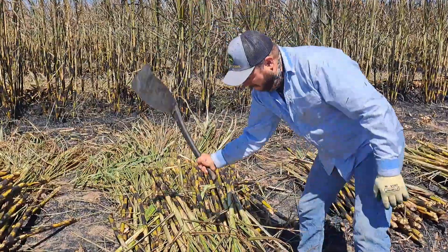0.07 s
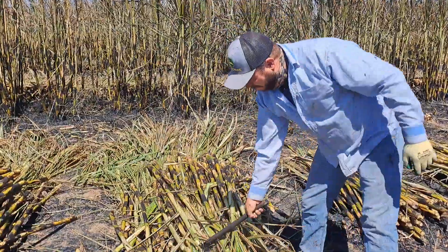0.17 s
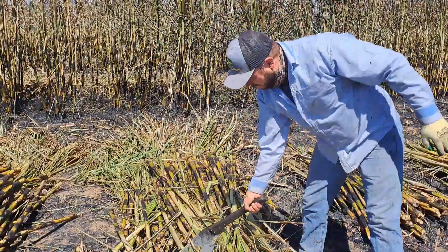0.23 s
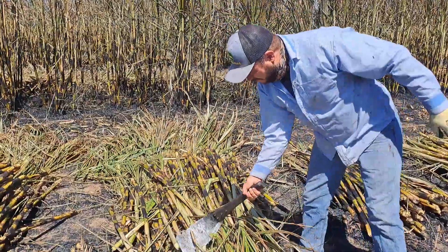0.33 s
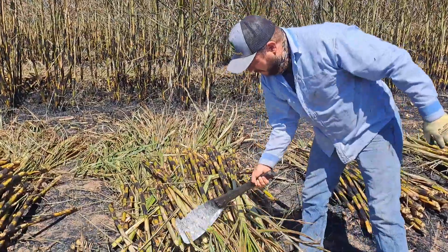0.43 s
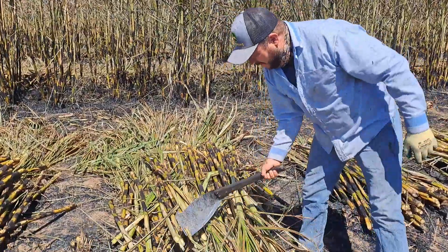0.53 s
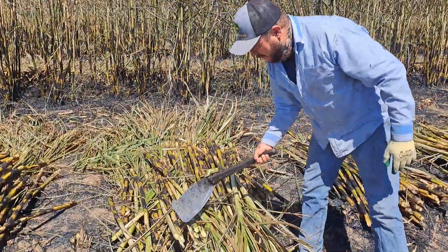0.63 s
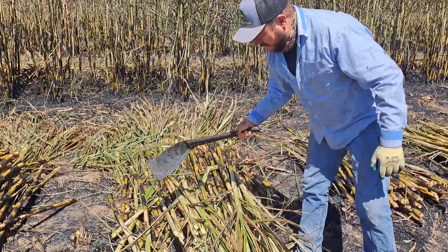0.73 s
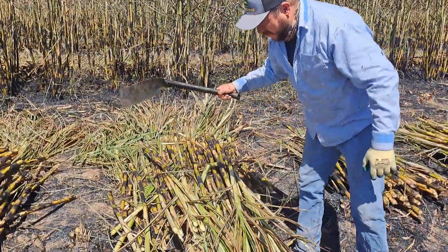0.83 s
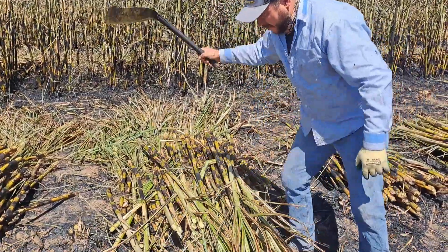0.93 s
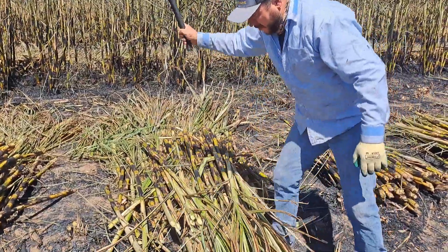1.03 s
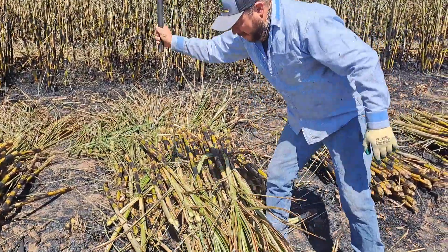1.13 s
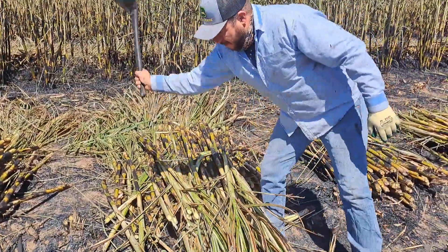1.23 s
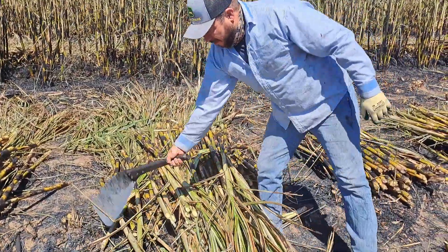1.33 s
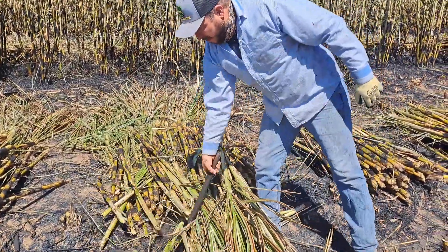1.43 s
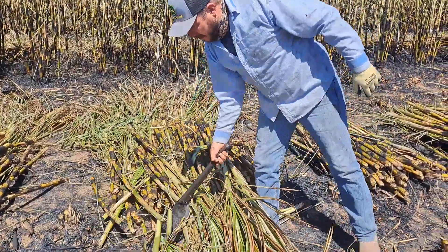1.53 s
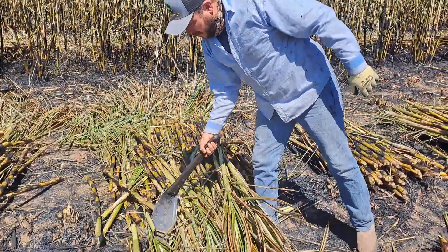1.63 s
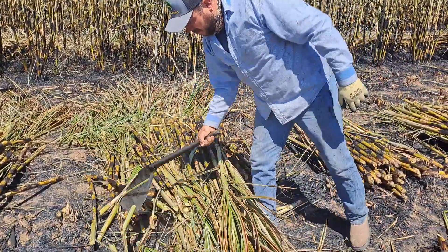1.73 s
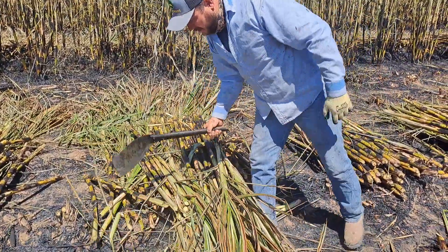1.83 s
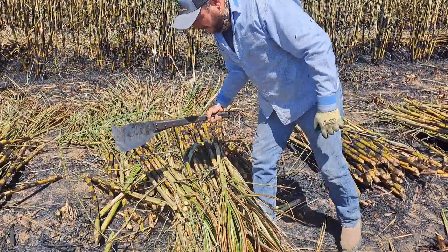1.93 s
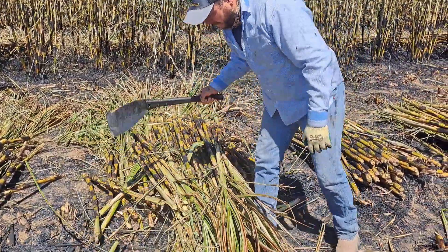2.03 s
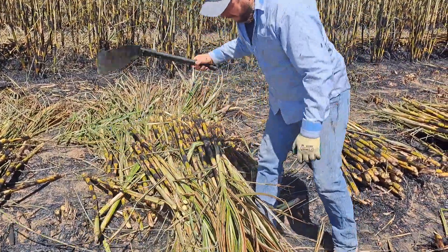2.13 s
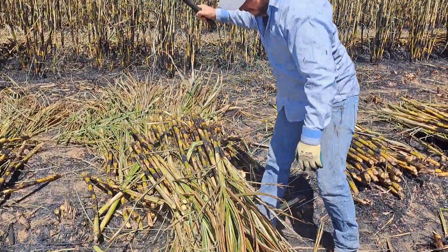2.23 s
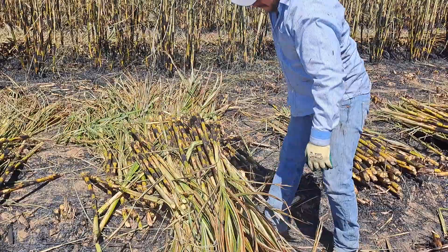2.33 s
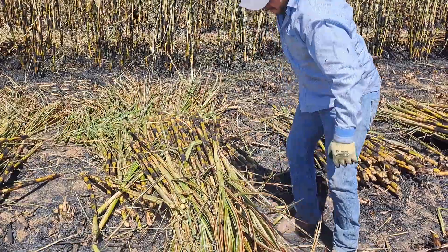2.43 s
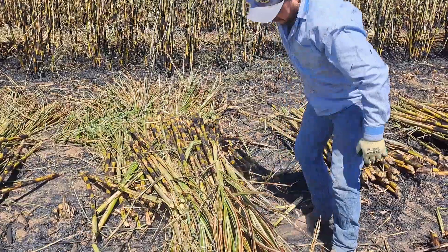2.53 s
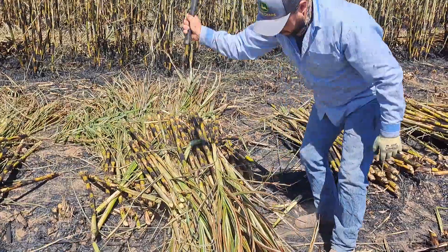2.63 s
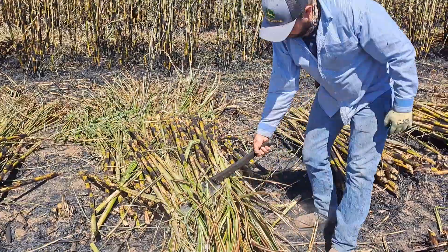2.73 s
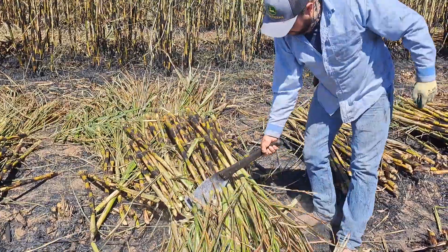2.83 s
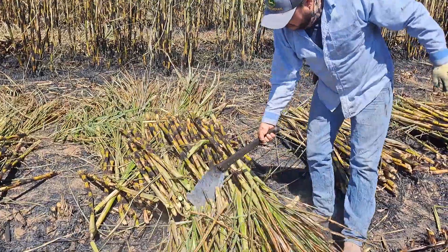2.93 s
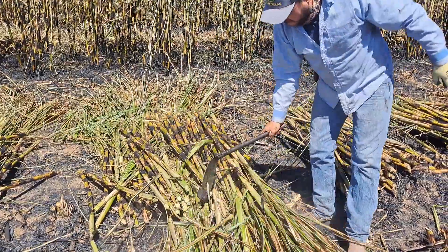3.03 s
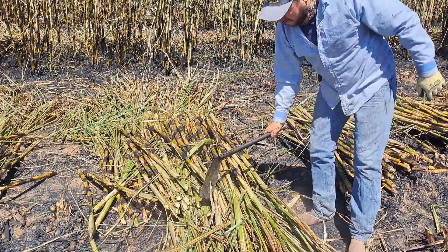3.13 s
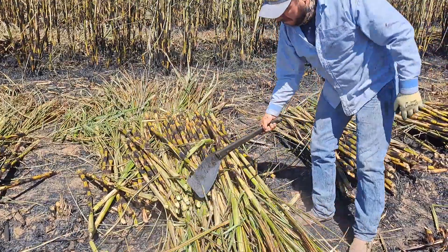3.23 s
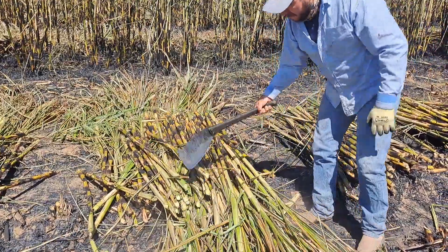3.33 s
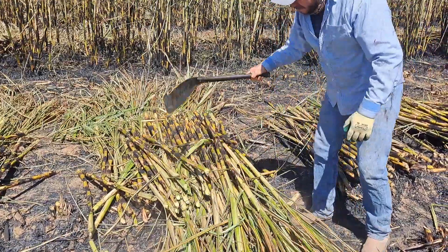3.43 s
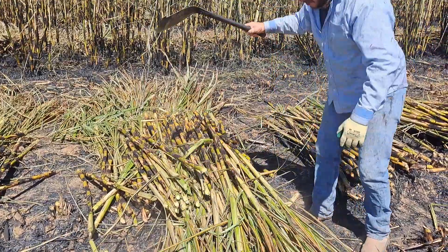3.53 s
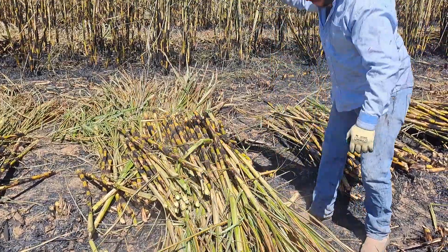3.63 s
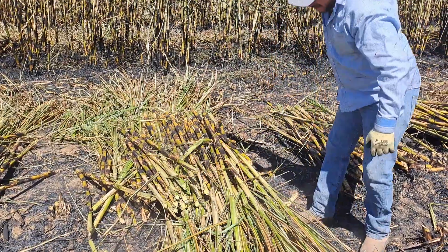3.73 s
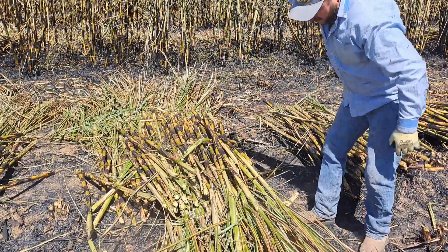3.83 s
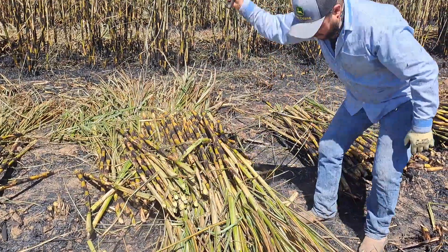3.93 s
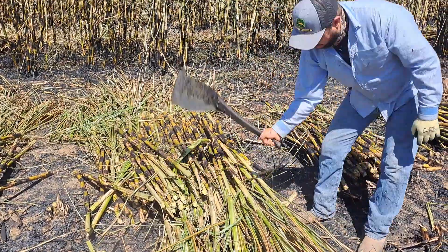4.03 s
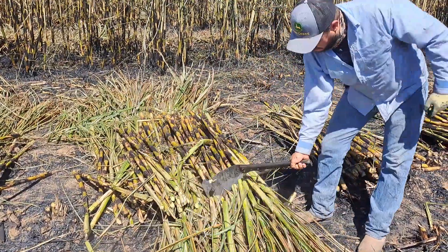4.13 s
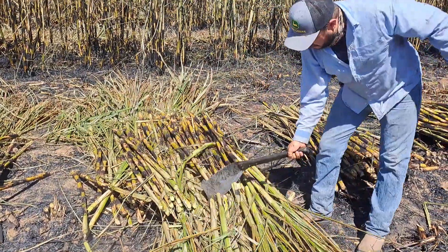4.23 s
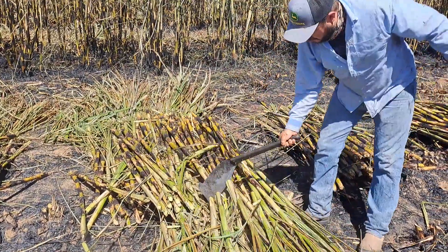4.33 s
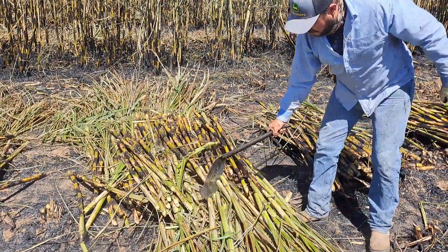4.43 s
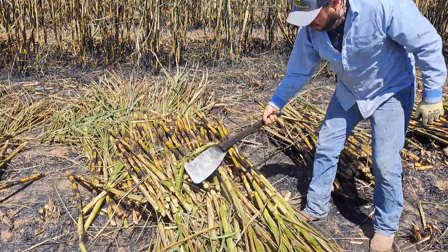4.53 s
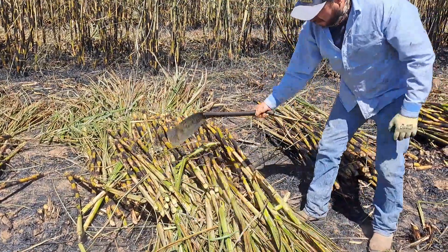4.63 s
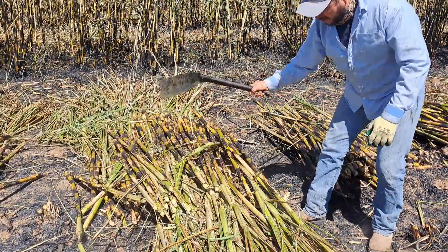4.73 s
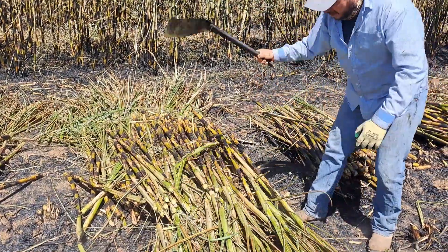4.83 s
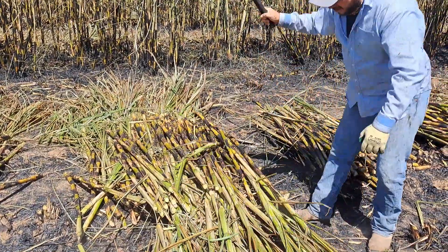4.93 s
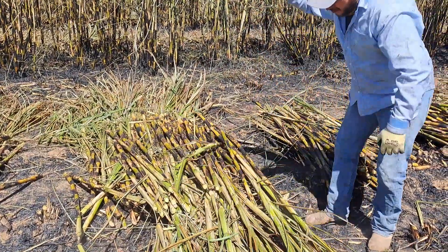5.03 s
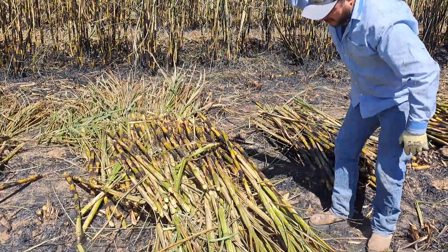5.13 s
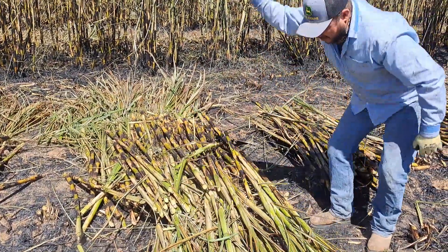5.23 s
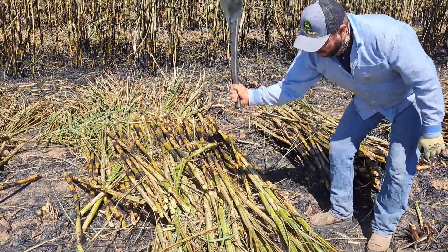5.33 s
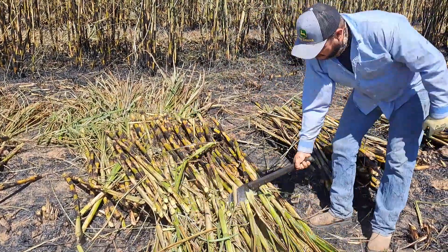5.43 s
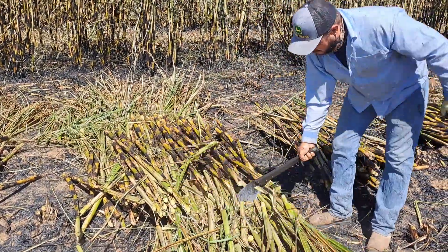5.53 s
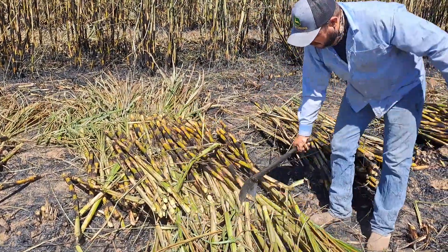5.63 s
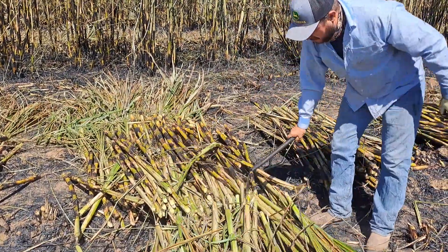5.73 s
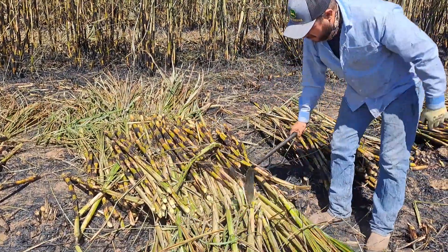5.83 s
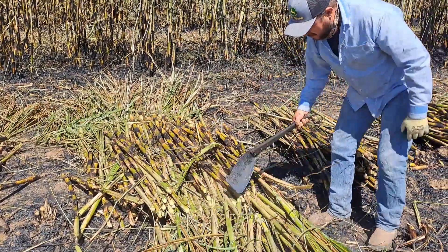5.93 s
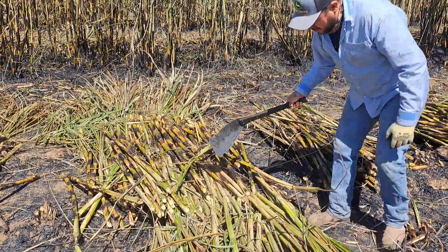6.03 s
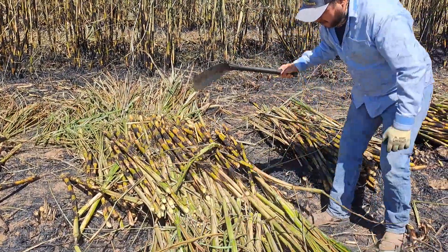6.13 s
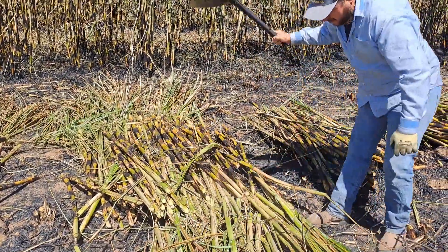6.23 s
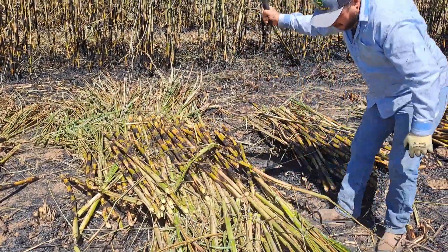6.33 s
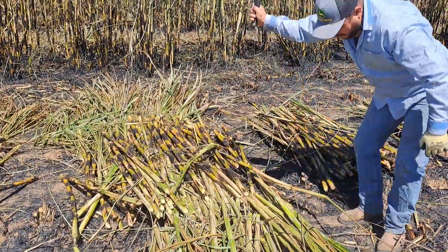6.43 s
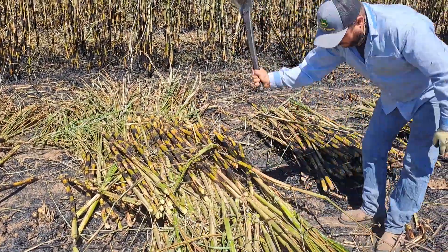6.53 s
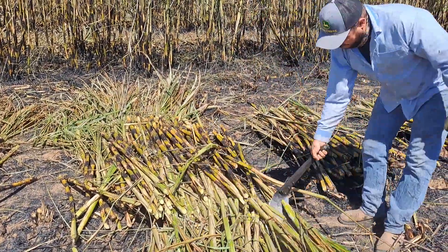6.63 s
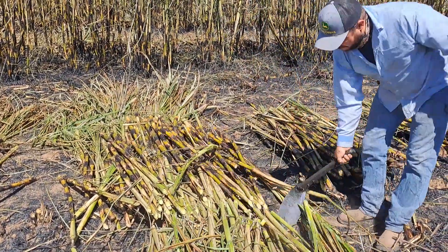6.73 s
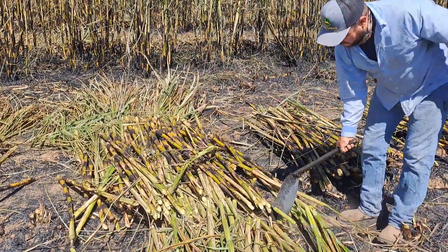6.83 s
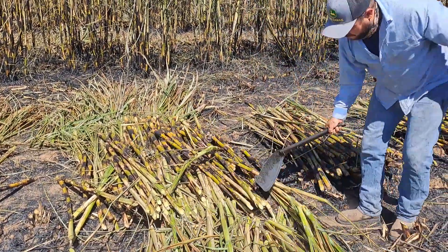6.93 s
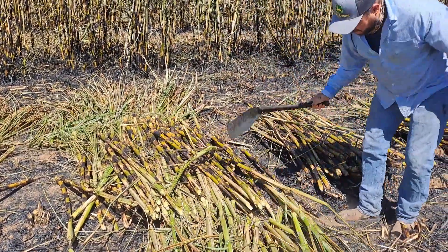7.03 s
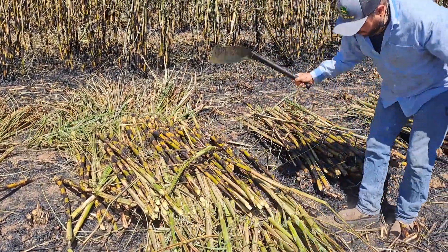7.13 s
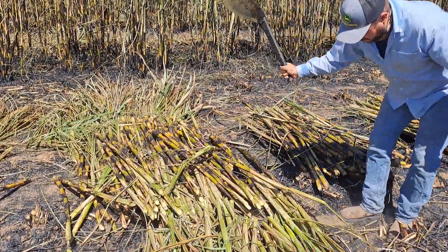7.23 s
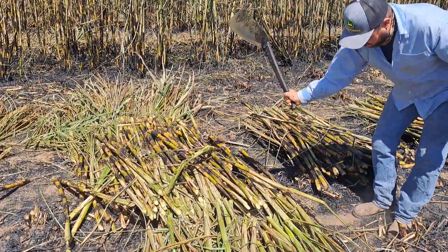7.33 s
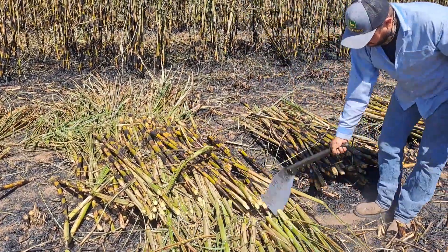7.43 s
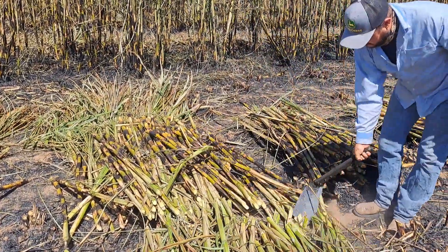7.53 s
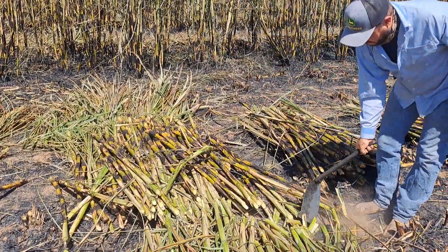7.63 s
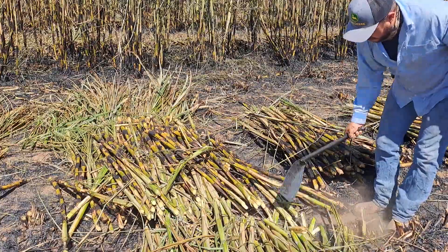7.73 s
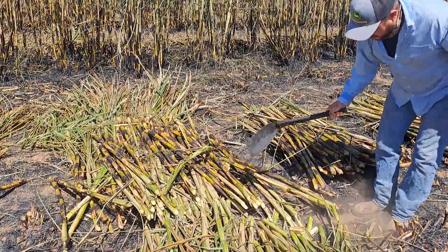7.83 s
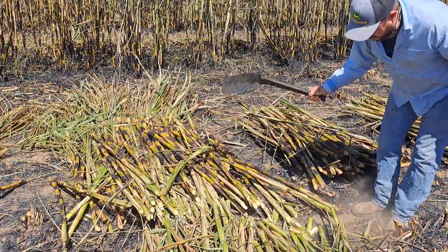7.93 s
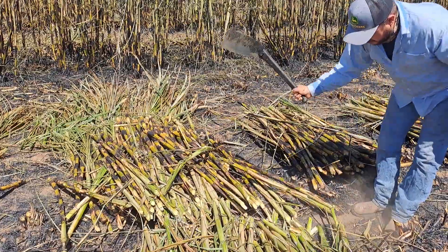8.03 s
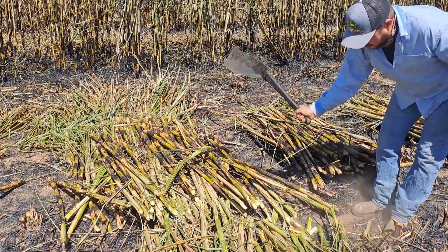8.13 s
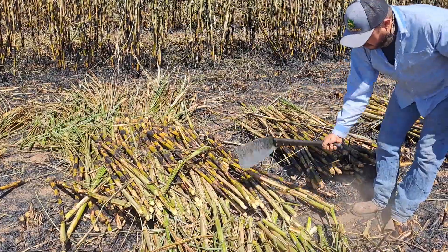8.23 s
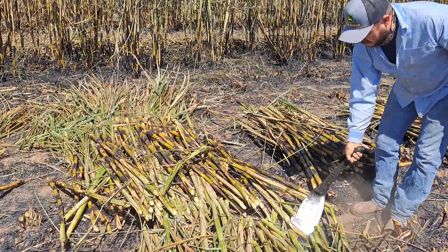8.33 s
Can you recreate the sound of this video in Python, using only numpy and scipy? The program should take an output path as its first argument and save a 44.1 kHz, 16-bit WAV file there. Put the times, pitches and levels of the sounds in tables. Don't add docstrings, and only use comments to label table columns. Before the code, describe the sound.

Open field, close phone microphones, dry sound with no room echo. Soft airy hiss, a thin insect drone and very faint distant bird notes lie underneath. A heavy blade strikes a heap of cane at about 0.2, 1.4, 2.8, 4.1, 5.5, 6.7 and 7.5 seconds. Each stroke is a tight cluster of woody cracks and torn fibre within milliseconds, with a short dull thud, then bright dry leaves crackle and settle for about half a second or more. Sharp leaf snaps stand out near 1.7 and 2.9; stalk ends scrape or knock at 1.8, 4.2 and 4.6. Boots and litter scuff lightly between strokes, notably 1.1-1.4 and 2.2-2.6. From about 4.8 wind buffets the microphones in low separate flutters, mostly right, strongest around 5.7-7.3, then easing. Small knocks and scuffs close the scene around 8.2-8.4.

```python
import sys
import numpy as np
from scipy import signal
from scipy.fft import rfft, irfft, next_fast_len
from scipy.io import wavfile
from scipy.ndimage import uniform_filter1d

SR = 44100
rng = np.random.default_rng(int(sys.argv[2]) if len(sys.argv) > 2 else 0)


def how_loud(loudness_db):
    steps = np.asarray(loudness_db, float) / 20
    return 10 ** steps


def materialize(psi):
    bounded = np.clip(np.atleast_2d(psi).T, -1, 1)
    quanta = np.round(bounded * 32767).astype(np.int16)
    wavfile.write(sys.argv[1], SR, quanta)


N = 369116
SIZE = next_fast_len(N + 4096)
COARSE = (np.arange(N) / SR)[::32]
BINS = np.arange(SIZE // 2 + 1)
OCTAVE = np.log2(np.maximum(BINS, 1) * SR / SIZE)


def colour(points):
    hz, db = np.transpose(points)
    return np.interp(OCTAVE, np.log2(hz), db)


def walk(rate):
    k = max(int(SR / 32 / rate), 1)
    held = np.repeat(rng.standard_normal(len(COARSE) // k + 1), k)
    return 2.55 * uniform_filter1d(uniform_filter1d(held, k), k)[:len(COARSE)]


def moving(db):
    return uniform_filter1d(np.repeat(how_loud(db), 32, axis=-1), size=32)[..., :N]


def add(out, s, sound):
    i = max(int(s * SR), 0)
    out[..., i:i + sound.shape[-1]] += sound[..., :N - i]


def bandpass(x, lo_hz, hi_hz, order=2):
    sos = signal.butter(order, [lo_hz, min(hi_hz, .45 * SR)], "band", fs=SR, output="sos")
    return signal.sosfilt(sos, x)


def hiss(count):
    both = rng.standard_normal(count)
    return both + bandpass(rng.standard_normal((2, *both.shape)) - both, 1200, 15000, order=1)


def burst(noise, wide, hz, ms, rise, broad):
    t = np.arange(noise.shape[1]) / SR * 1000 / max(ms, .5)
    centre = bandpass(noise, hz / 1.7, hz * 1.4, order=1) * np.sqrt(9000 / hz)
    return (centre + broad * wide) * np.exp(-t) * (1 - np.exp(-t / rise))


def ring(t, hz, ms, rise_ms):
    lag, turn = .00005 * rng.standard_normal((2, 1)), rng.random()
    note = np.sin(2 * np.pi * (hz * (t + lag) + turn))
    return note * np.exp(-1000 * t / ms) * (1 - np.exp(-1000 * t / rise_ms))


def banded(sources, points, gain_db, count=1):
    shape, out = how_loud(colour(points)), np.zeros((2, N))
    middle = (OCTAVE > np.log2(3000)) & (OCTAVE < np.log2(12000))
    shape /= np.sqrt(np.mean(shape[middle] ** 2) * 9000 / (SR / 2))
    bands_hz = 180 * 2 ** np.arange(0, 6.6, .5)
    for k, hz in enumerate(bands_hz[::count]):
        window = np.cos(np.pi * np.clip((OCTAVE - np.log2(hz)) / count, -.5, .5))
        band = irfft(sources[k % len(sources)] * (shape * window), SIZE)[:, :N]
        out += band * moving(gain_db(hz))
    return out


# (pitch [Hz], level [dB per Hz])
FIELD_COLOUR = [(150, -13.5), (260, -17.5), (500, -32.5), (1000, -20), (1800, -15), (2300, -9),
                (2800, -17.5), (7800, -18), (9800, -12.5), (15500, -45)]
# (start [s], end [s], first pitch [Hz], last pitch [Hz], level [dB])
BIRD = [(3.92, 4.13, 4027, 4027, -72), (3.9, 4.13, 2040, 2110, -74), (3.4, 3.55, 2342, 2342, -67),
        (3.38, 3.62, 760, 900, -71), (3.57, 3.7, 2094, 2094, -70), (3.72, 3.83, 2320, 2320, -73),
        (4.06, 4.117, 1250, 1700, -68), (4.05, 4.117, 800, 950, -70), (0.125, 0.15, 1300, 1400, -62),
        (0.145, 0.175, 800, 950, -60), (6.17, 6.32, 610, 450, -66), (6.53, 6.66, 305, 315, -60)]


def field():
    swell = 1.1 * walk(0.37)
    air = [rfft(hiss(N), SIZE) for _ in range(2)]
    out = banded(air, FIELD_COLOUR, lambda hz: -65.5 + swell + 0.53 * walk(8.0), count=2)
    insects = bandpass(rng.standard_normal((2, N)), 2330, 2450, order=1)
    out += insects * moving(-55 + 1.43 * walk(4.9))
    for start, end, first_hz, last_hz, db in BIRD:
        t = np.arange(int((end - start) * SR)) / SR
        phase = 2 * np.pi * (first_hz * t + (last_hz - first_hz) * t ** 2 / (2 * t[-1]))
        add(out, start, how_loud(db) * np.sin(phase) * np.abs(np.sin(np.pi * t / t[-1])) ** .5)
    return out


# (time [s], level [dB], left minus right [dB])
BREEZE = [(0.0, -64.5, 1.5), (3.45, -63, 1), (3.87, -67.5, 3.5), (4.68, -64.5, -3.5), (4.85, -58.5, -9),
          (5.69, -58.5, -16.5), (6.13, -51, 0), (6.6, -50.5, -6), (7.11, -54.5, 0.5), (7.25, -49, -19),
          (7.45, -56, -1), (8.16, -56, -1.5), (8.37, -68.5, 5)]
# (time [s], level [dB], pitch [Hz])
LEFT_PUFFS = [(6.077, -34, 62), (6.154, -25, 69.6), (6.233, -30, 64), (6.273, -29, 73), (6.752, -27, 101),
              (6.847, -31, 77), (6.968, -26, 73), (7.01, -29, 75), (7.125, -33, 62), (7.651, -25, 76),
              (7.699, -24.5, 83.5), (7.899, -30, 57.6)]
# (time [s], level [dB], pitch [Hz])
RIGHT_PUFFS = [(4.834, -29.5, 79), (5.095, -25, 84), (5.373, -29.5, 81), (5.636, -25, 76),
               (5.668, -24.5, 73), (5.71, -20, 103), (5.797, -21.5, 83), (5.901, -18.5, 67),
               (5.982, -28.5, 117), (6.088, -26.5, 101), (6.169, -31, 82), (6.211, -24, 87),
               (6.264, -23.5, 75), (6.294, -20, 150), (6.307, -18.5, 82), (6.362, -27, 76),
               (6.535, -21, 109), (6.558, -22.5, 121), (6.59, -21, 94), (6.632, -14.5, 109),
               (6.652, -22, 80), (6.786, -20.5, 80.5), (6.813, -18, 148), (6.971, -13, 110),
               (7.022, -30, 74), (7.245, -22.5, 81), (7.294, -15.5, 82), (7.341, -20.5, 57.7),
               (7.474, -25, 68.5), (8.139, -30, 68)]


def wind():
    s, db, pan_db = np.transpose(BREEZE)
    rumble = bandpass(rng.standard_normal((2, N)), 41.5, 77.7)
    rumble += 0.099 * bandpass(rng.standard_normal((2, N)), 22, 170)
    pan = np.interp(COARSE, s, pan_db) * np.array([[.5], [-.5]])
    gusty = np.array([0.9 * walk(12), 0.9 * walk(12)])
    out = rumble / rumble.std() * moving(np.interp(COARSE, s, db) + pan + gusty + 12.0)
    t = np.arange(-3000, 5000) / SR
    slap_noise = rng.standard_normal((len(LEFT_PUFFS) + len(RIGHT_PUFFS), len(t)))
    slaps = iter(bandpass(slap_noise, 72, 240, order=3))
    for port, puffs, turns in zip(out, (LEFT_PUFFS, RIGHT_PUFFS), (0.86, 0.92)):
        for s, db, hz in puffs:
            width = turns / hz / 2 * np.where(t < 0, .7, 1.3)
            eddy = np.exp(-.5 * (t / width) ** 2) * np.cos(2 * np.pi * (hz * t + rng.random()))
            slap = next(slaps) * np.exp(-.5 * (t / 0.011) ** 2)
            add(port, s + t[0], how_loud(db) * (eddy - eddy.mean() + how_loud(0.64 * db + 18.0) * slap))
    return out


def clicks(count, scatter_db, lag_ms, lag_spread_ms):
    place, lag = rng.random(count), rng.standard_normal(count)
    size = how_loud(scatter_db * np.minimum(rng.exponential(size=count), 6))
    size *= np.sign(rng.random(count) - .5)
    right = place * N
    left = np.clip(right + (lag_ms + lag_spread_ms * lag) * SR / 1000, 0, N - 1)
    out = np.array([np.bincount(at.astype(int), size, N) for at in (left, right)])
    return rfft(out / out.std(), SIZE)


def sudden(s, db_per_s, attack_s):
    since = np.maximum(COARSE - s, 0)
    return np.minimum(since / attack_s, 1) ** 2 * how_loud(-2 * np.multiply.outer(db_per_s, since))


# (time [s], level [dB], fading [dB per s], weight [dB], dust [dB])
STEPS = [(0.0, -55, 66, 0.5, -18), (2.27, -61, 89.5, -1, -2), (2.327, -51, 56, 2, -18),
         (3.834, -50, 244, -9, -20), (4.727, -31, 145, -12, -56), (4.78, -36, 145, -5, -18),
         (5.18, -48, 294, -8, -12), (7.29, -45, 71, 1.5, -14), (8.205, -46.5, 140, 0, -27),
         (8.35, -64, 28, 2, -22)]
# (time [s], crush level [dB], settling level [dB], settling loss [dB per s], blade stays in the heap [s])
STROKES = [(0.178, -20, -26.5, 45, 0.5), (1.414, -26, -29, 23, 0.49), (2.786, -18.5, -29, 28, 0.7),
           (4.12, -27, -32, 17, 0.85), (5.458, -22, -29, 20.5, 0.53), (6.683, -20, -28.5, 35.5, 0.73),
           (7.508, -29, -32, 51, 0.45)]
# (middle time [s], level [dB], half length [s], weight [dB], dust [dB])
SWEEPS = [(0.755, -62, 0.078, 9, -12), (1.11, -50, 0.045, 3, -10.5), (1.22, -57, 0.029, -7, -22),
          (1.32, -52, 0.086, -8, -35), (1.471, -38, 0.026, 6, -18), (2.51, -50, 0.066, 3.5, -7.5),
          (2.657, -59, 0.041, 0, -5.5), (2.823, -27.5, 0.016, 1, -14), (3.866, -77.5, 0.07, 4, -18),
          (4.028, -83, 0.037, -4, -14), (4.171, -30, 0.022, 0, -21), (5.07, -48.5, 0.086, 0, -19),
          (5.434, -43.5, 0.16, -7.5, -15), (6.2, -54, 0.11, -8.5, -10.5), (6.443, -58.5, 0.049, 9, -14),
          (6.636, -56.5, 0.088, -2, -18), (8.0, -68, 0.12, 6.5, -20), (8.372, -38, 0.0069, 0, -20.5)]


def movement():
    swish_db, swish_s = [-70, -59, -71, -88, -62], .04
    crush_db_each, crush_db_per_s = [-0.5, 3.5, -8, -11, -4], np.array([150, 450, 114, 150, 200])
    settle_db_each = [1, -4.5, -1.57, -11, -3]
    power = np.full((5, len(COARSE)), 1e-12)

    def column(db):
        return how_loud(2 * np.array(db))[:, None]

    def stir(db, weight_db, dust_db):
        return column([db, db + weight_db, db - 3.5, db + dust_db, db + weight_db / 2])

    for s, db, db_per_s, weight_db, dust_db in STEPS:
        power += stir(db, weight_db, dust_db) * sudden(s, db_per_s, attack_s=0.0053)
    for s, crush_db, settle_db, db_per_s, stay_s in STROKES:
        rest = how_loud(-2 * 52.5 * np.maximum(COARSE - s - stay_s, 0))
        thin = [0, 0, 0, -0.58 * s, 0]
        power += column(swish_db) * np.exp(-np.abs(COARSE - s) / swish_s)
        crush = column(np.add(crush_db_each, thin) + crush_db)
        power += crush * sudden(s, crush_db_per_s, attack_s=0.0015)
        settle = column(np.add(settle_db_each, thin) + settle_db)
        power += settle * sudden(s, db_per_s, attack_s=0.0059) * rest
    for s, db, half_s, weight_db, dust_db in SWEEPS:
        power += stir(db, weight_db, dust_db) * np.exp(-((COARSE - s) / half_s) ** 2)
    db = 10 * np.log10(power)
    return np.vstack([db[:1], db[1:] - db[0]])


# (pitch [Hz], level [dB per Hz])
LEAF_COLOUR = [(120, -7.5), (200, -13.5), (490, -9), (774, -5), (1100, -7.5), (1340, -2.5), (1580, -4.5),
               (1930, -0.5), (3940, -2.5), (7740, -3.5), (9820, 3), (11200, -0.5), (15800, -26.5)]


def leaves():
    part_db = np.array([[3.5], [2.5], [-.8], [13.5], [-4]])
    crackle_db, heavy_db, crisp_db, dust_db, hollow_db = movement() + part_db
    broad = clicks(count=40000, scatter_db=2.9, lag_ms=.12, lag_spread_ms=.11)
    fine = clicks(count=150000, scatter_db=2.0, lag_ms=.12, lag_spread_ms=.08)
    fine = fine + .5 * clicks(count=5000, scatter_db=2.6, lag_ms=.12, lag_spread_ms=.11)
    shiver = 0.5 * walk(35) + 0.46 * walk(140)

    def gain_db(hz):
        heavy = np.interp(np.log2(hz), np.log2([2200, 3100]), [1, 0])
        if hz > 12500:
            top_db = dust_db
        else:
            top_db = np.interp(np.log2(hz), np.log2([6000, 8200]), [0, 1]) * crisp_db
        top_db = top_db + (11000 < hz < 12500) * 0.55 * dust_db
        edge = 0.025 * (hz < 600) * (crackle_db + 46.5)
        return crackle_db + heavy * heavy_db + top_db + edge + shiver + 0.55 * walk(70)

    sources = []
    for k in (1, 2, 3):
        late = np.exp(-2j * np.pi * (BINS * 30011 * k % SIZE) / SIZE)
        sources.append(np.sqrt(.22) * broad + np.sqrt(.78) * 0.99 * fine * late)
    hollow = bandpass(hiss(N), 1900, 2580, order=3)
    hollow = hollow * moving(crackle_db + hollow_db + shiver + 1.4 * walk(60))
    return hollow + banded(sources, LEAF_COLOUR, gain_db)


# (time [s], level [dB], centre pitch [Hz], length [ms])
SCUFFS = [(0.051, -37, 900, 13), (0.671, -37.5, 696, 15), (1.099, -30, 2330, 17), (1.185, -34.5, 4400, 22),
          (1.25, -35, 4500, 22), (1.283, -31, 2370, 18), (1.31, -33.5, 4300, 20), (1.36, -34.5, 4600, 22),
          (1.847, -14, 2420, 6.6), (2.112, -28.5, 1600, 10), (2.2, -36, 1290, 13), (2.33, -32, 2090, 11),
          (2.36, -33.5, 2200, 20), (2.485, -28.5, 2400, 16), (2.669, -31.5, 960, 9.8),
          (4.243, -12.5, 2380, 6.3), (4.557, -12.5, 1980, 8), (4.732, -22.5, 2370, 7.9),
          (5.047, -32.5, 2420, 13), (6.404, -35, 2270, 12), (7.298, -25, 2380, 12), (7.91, -30, 1470, 16),
          (8.21, -26, 2100, 7.5), (8.348, -26, 1370, 13)]


def scuffs():
    out, noise = np.zeros((2, N)), hiss((len(SCUFFS), 3000))
    wide = bandpass(noise, 370, 15000)
    for k, (s, db, hz, ms) in enumerate(SCUFFS):
        add(out, s, how_loud(db - 10.5) * burst(noise[:, k], wide[:, k], hz, ms, rise=0.25, broad=0.2))
    return out


# (time [s], level [dB], pitch [Hz])
THUDS = [(0.057, -57, 178), (0.178, -27, 568), (0.397, -43, 265), (0.673, -55, 224), (0.822, -52.5, 199),
         (1.063, -52.5, 238), (1.277, -56, 238), (1.415, -25, 177), (1.779, -61, 438), (2.115, -70, 164),
         (2.196, -46, 273), (2.334, -44.5, 204), (2.402, -43.5, 272), (2.515, -47, 229),
         (2.666, -44.5, 335), (2.785, -24, 375), (3.327, -46, 219), (3.834, -62, 311), (4.118, -29, 257),
         (5.048, -45, 242), (5.128, -47, 210), (5.46, -25, 280), (6.683, -50, 257), (7.286, -42, 156),
         (7.51, -24, 197), (7.911, -48, 230), (8.216, -47.5, 190), (8.347, -47, 553)]


def thuds():
    out, t = np.zeros((2, N)), np.arange(4000) / SR
    soil = bandpass(rng.standard_normal((len(THUDS), len(t))), 60, 520)
    for (s, db, hz), rumble in zip(THUDS, soil):
        body = 0.8 * np.sin(2 * np.pi * hz * t) + 5 * rumble
        add(out, s, how_loud(db - 6.0) * body * (t / 0.0092) * np.exp(1 - t / 0.0082))
    return out


# (time [s], level [dB], pitch [Hz])
KNOCKS = [(0.058, -52, 1420), (0.058, -54, 940), (0.506, -34, 3230), (0.672, -48, 820), (0.824, -53, 1340),
          (1.063, -59, 730), (1.702, -29, 2050), (1.78, -39, 1380), (2.114, -49, 1810), (2.115, -56, 1250),
          (2.199, -57, 1380), (2.213, -54, 780), (2.308, -53, 5800), (2.332, -46, 2110), (2.335, -51, 1210),
          (2.667, -57, 5810), (2.67, -47, 1980), (2.67, -46, 905), (2.706, -54.5, 2500), (3.506, -48, 4500),
          (3.665, -52, 5080), (3.837, -52, 4390), (3.838, -51, 3100), (3.839, -62, 5510),
          (3.839, -51.5, 2650), (4.243, -38, 820), (4.561, -26, 1990), (4.566, -41, 1290),
          (4.734, -33, 2330), (4.738, -33, 3490), (5.041, -43, 780), (5.133, -41, 2420), (5.182, -43, 4170),
          (5.183, -48, 5170), (5.183, -45, 3490), (5.338, -41, 2770), (5.97, -33, 2470), (6.368, -54, 3620),
          (6.425, -48, 3010), (7.308, -45, 1770), (7.428, -47, 5680), (7.912, -48, 780), (7.912, -46, 1460),
          (8.209, -53, 3920), (8.209, -46, 4740), (8.209, -44, 5430), (8.211, -44, 1770), (8.212, -54, 860),
          (8.218, -49, 4690), (8.22, -45, 5340), (8.221, -43, 2150), (8.222, -43, 1510), (8.35, -48, 1350),
          (8.365, -44.5, 3450), (8.366, -42.5, 4220), (8.367, -54, 5680), (8.367, -42.5, 1460),
          (8.367, -42.5, 2930), (8.367, -41, 2200), (8.367, -38, 690)]


def knocks():
    out, t = np.zeros((2, N)), np.arange(1200) / SR
    for s, db, hz in KNOCKS:
        add(out, s - .001, how_loud(db + 5.5) * ring(t, hz, ms=3.9, rise_ms=.9))
    return out


# (time [s], level [dB], stalk pitch [Hz])
CUTS = [(0.1796, -16, 736), (0.1811, -24, 2890), (0.1814, -15, 1850), (0.1824, -17, 1200),
        (0.1831, -20, 5470), (0.1839, -21.5, 2370), (0.1849, -16, 3260), (0.1871, -23, 2220),
        (1.4161, -23, 1310), (1.4161, -16.5, 1940), (1.4176, -20.5, 5300), (1.4223, -18, 910),
        (1.4251, -19, 1440), (1.4261, -17, 2400), (1.4298, -20, 1850), (1.4355, -20.5, 1320),
        (2.788, -16.5, 1930), (2.7885, -20, 1120), (2.79, -15.5, 5240), (2.7902, -17, 1840),
        (2.7917, -16.5, 1380), (2.7929, -20, 1980), (2.7974, -20.5, 1640), (2.7977, -11, 896),
        (4.1202, -20, 1590), (4.1209, -17.5, 830), (4.1244, -18.5, 1770), (4.1282, -23.5, 1650),
        (4.1284, -19.5, 2410), (4.1289, -13, 814), (4.1317, -25, 1940), (4.1559, -26.5, 2050),
        (5.4571, -17, 2610), (5.4576, -17.5, 970), (5.4639, -13.5, 1920), (5.4639, -17, 2670),
        (5.4649, -13.5, 790), (5.4681, -13, 1440), (5.4689, -15.5, 2420), (5.4701, -15.5, 2970),
        (6.6868, -18, 2260), (6.6873, -23, 1330), (6.6883, -17.5, 900), (6.6908, -14.5, 3550),
        (6.6933, -19, 2220), (6.7038, -17.5, 1280), (6.7038, -21.5, 1940), (6.7098, -17.5, 1940),
        (7.5125, -13, 1900), (7.5127, -18, 855), (7.5137, -18.5, 4170), (7.518, -22.5, 3570),
        (7.5195, -24.5, 4180), (7.5197, -18.5, 990), (7.5207, -15, 2360), (7.5225, -21, 2970)]


def cuts():
    out, t = np.zeros((2, N)), np.arange(1200) / SR
    fibre = bandpass(hiss((len(CUTS), len(t))), 550, 4500) * np.exp(-t / 0.0033)
    crack = bandpass(hiss((len(CUTS), len(t))), 6100, 15000) * np.exp(-t / 0.0014)
    for k, (s, db, hz) in enumerate(CUTS):
        wood = 2.27 * ring(t, hz, ms=1.73, rise_ms=0.52)
        add(out, s - .0003, how_loud(db) * (wood + .6 * fibre[:, k] + 0.97 * crack[:, k]))
    return out


# (time [s], level [dB], centre pitch [Hz])
TICKS = [(0.5057, -26, 9300), (0.554, -26.5, 5210), (1.6776, -14.5, 10400), (1.702, -9.5, 9240),
         (1.7023, -16, 2100), (1.812, -23, 2920), (2.309, -36, 5000), (2.6365, -34.5, 9540),
         (2.707, -40.5, 2530), (2.948, -15.5, 9660), (2.29, -48, 1100), (2.352, -42, 900),
         (2.62, -40.5, 3000), (3.399, -28.5, 5740), (3.498, -32.5, 2330), (3.99, -49, 6500),
         (3.837, -40, 2770), (3.851, -40.5, 10400), (4.08, -46, 9000), (4.675, -28, 11500),
         (4.877, -27, 4480), (4.915, -30.5, 9280), (5.0776, -38.5, 8880), (5.134, -31, 2420),
         (5.1827, -27.5, 3460), (5.1973, -31, 10700), (6.052, -37.5, 2310), (6.3, -34.5, 9500),
         (7.205, -27.5, 9450), (7.254, -18.5, 11000), (7.588, -23.5, 6000), (7.885, -33, 2270),
         (8.06, -44, 6000), (8.115, -44, 10000), (8.17, -44, 9500)]


def ticks():
    out, noise = np.zeros((2, N)), hiss((len(TICKS), 3000))
    wide = bandpass(noise, 370, 15000)
    for k, (s, db, hz) in enumerate(TICKS):
        add(out, s, how_loud(db - 6.0) * burst(noise[:, k], wide[:, k], hz, ms=2.5, rise=.06, broad=0.47))
    return out


# (pitch [Hz], left minus right [dB])
PORT_TILT = [(250, 0), (700, 1.5), (1300, -4), (2400, -6), (4400, -5), (6500, 0.5), (9500, -11),
             (15000, -9.5)]
# (pitch [Hz], level [dB])
PHONE_NOTCH = [(330, 3), (490, -5.5), (680, -1.5)]


def scene():
    treble = how_loud(np.where(OCTAVE > np.log2(4000), 0.66 * colour(LEAF_COLOUR) + 3.4, 0))
    hits = scuffs() + thuds() + knocks() + cuts() + ticks()
    air = rfft(field() + leaves(), SIZE) + rfft(hits, SIZE) * treble
    tilt = colour(PORT_TILT) / 2
    shade = how_loud(np.array([tilt, -tilt]) + colour(PHONE_NOTCH) + 3.5)
    return irfft(air * shade, SIZE)[:, :N] + wind()


def top_cut(x):
    return signal.sosfilt(signal.butter(12, 16520, fs=SR, output="sos"), x)


def record(dry):
    mix = signal.sosfilt(signal.butter(2, 30, "high", fs=SR, output="sos"), dry)
    mix = np.tanh(mix / 1.05) * 1.05
    mix = signal.sosfilt(signal.ellip(10, .2, 45, 15650, fs=SR, output="sos"), mix)
    return top_cut(mix)


dry = scene()
out = record(dry)
materialize(out)
```